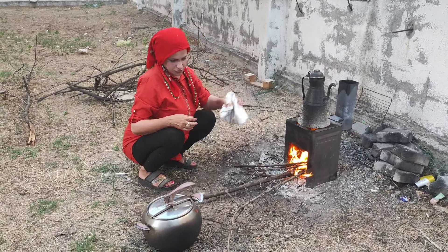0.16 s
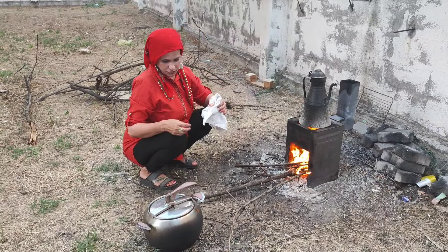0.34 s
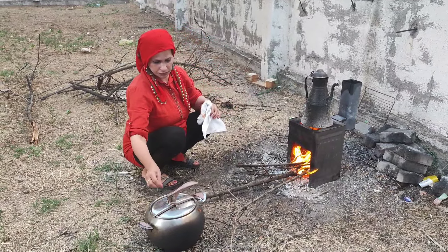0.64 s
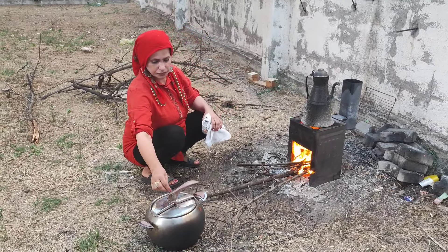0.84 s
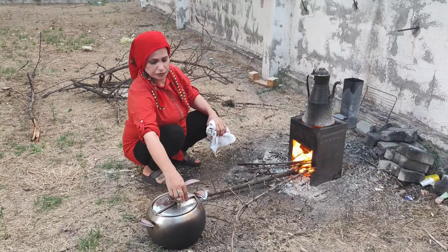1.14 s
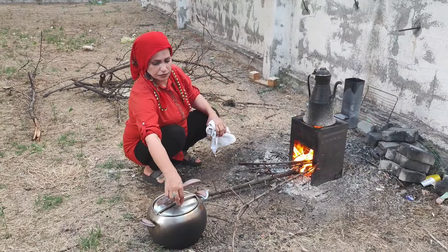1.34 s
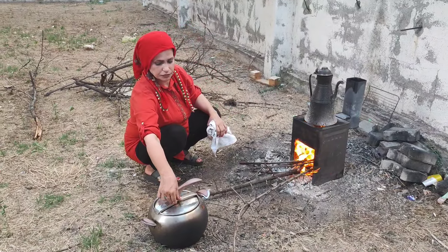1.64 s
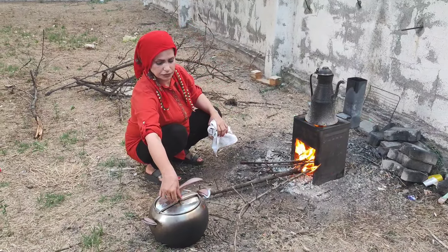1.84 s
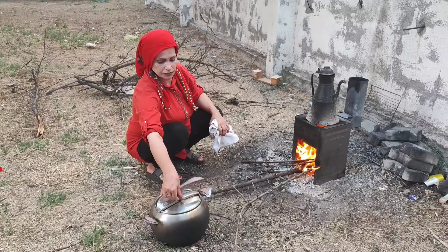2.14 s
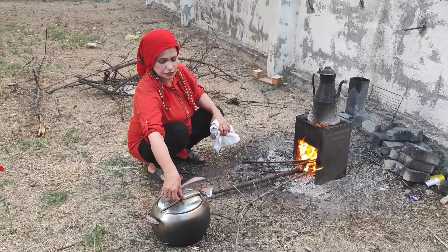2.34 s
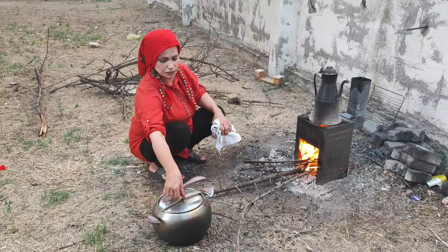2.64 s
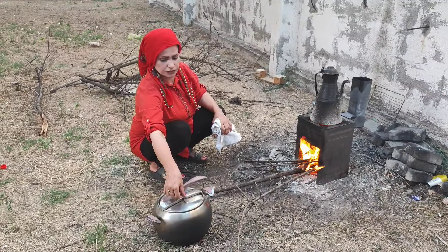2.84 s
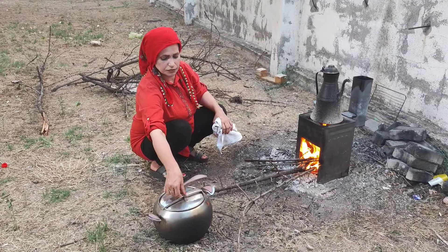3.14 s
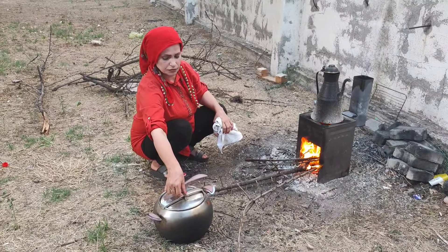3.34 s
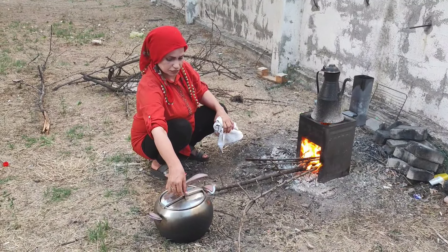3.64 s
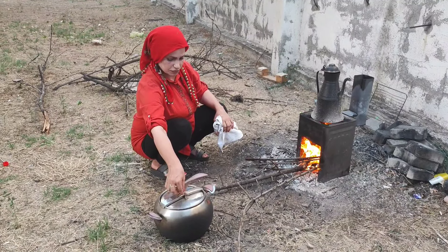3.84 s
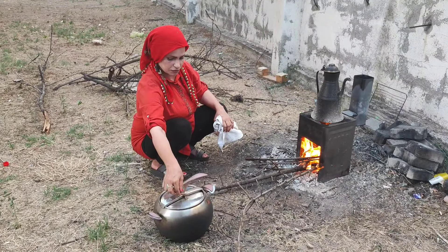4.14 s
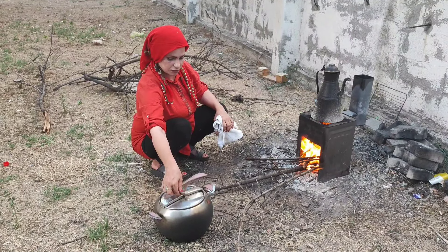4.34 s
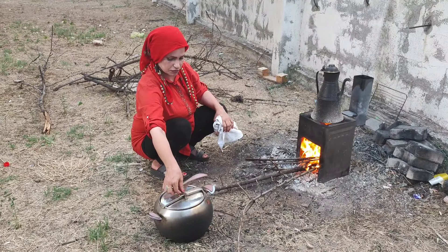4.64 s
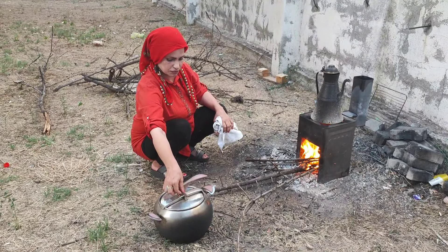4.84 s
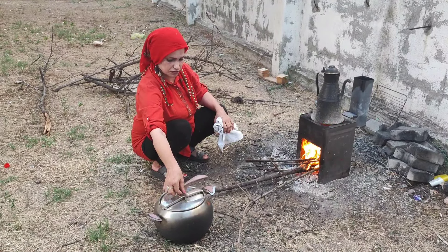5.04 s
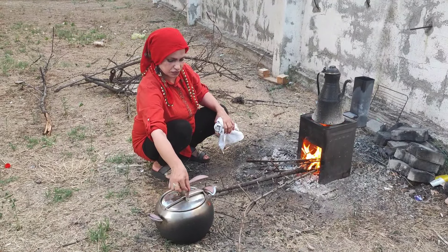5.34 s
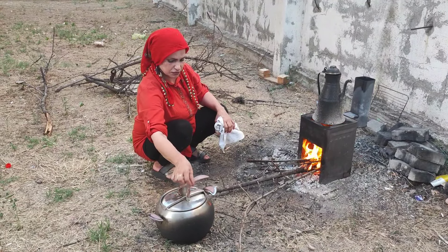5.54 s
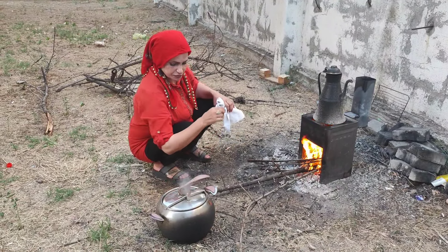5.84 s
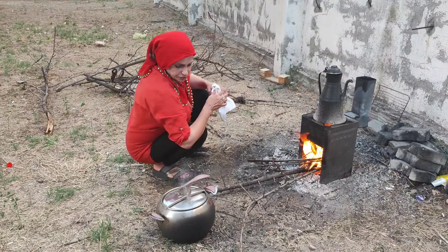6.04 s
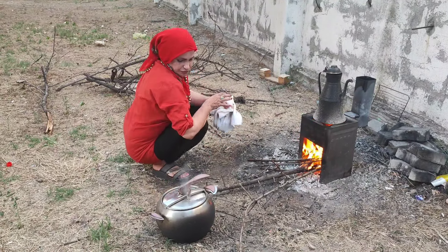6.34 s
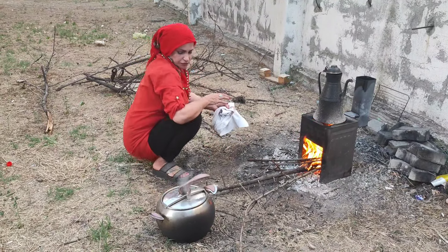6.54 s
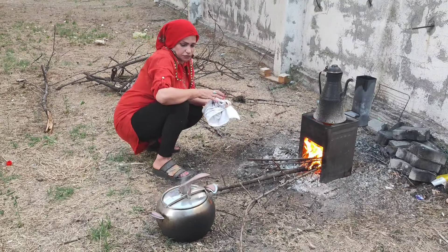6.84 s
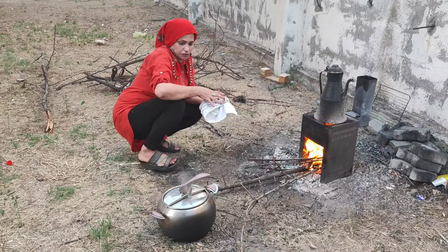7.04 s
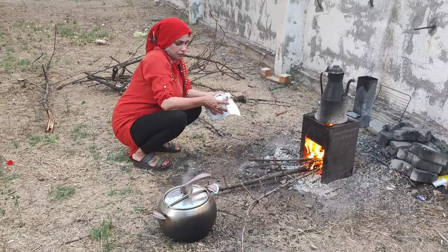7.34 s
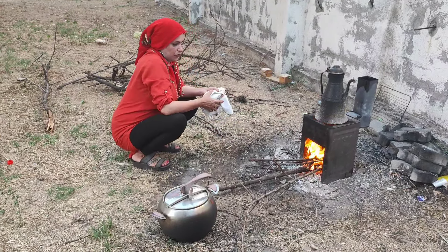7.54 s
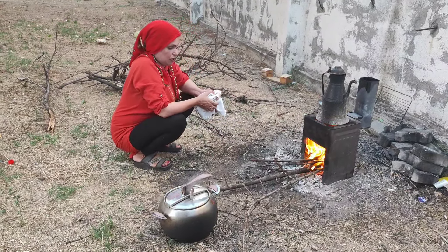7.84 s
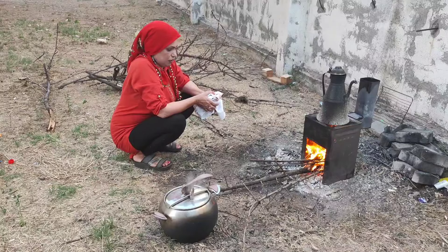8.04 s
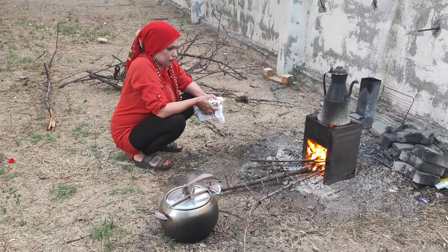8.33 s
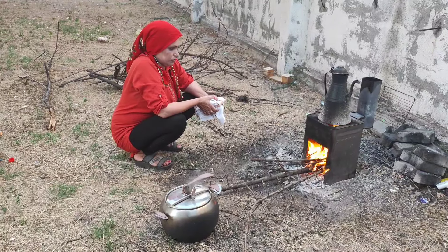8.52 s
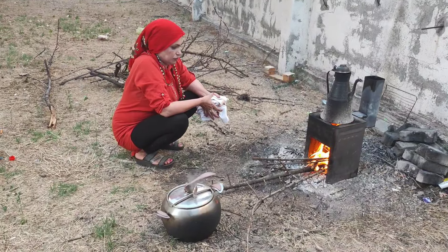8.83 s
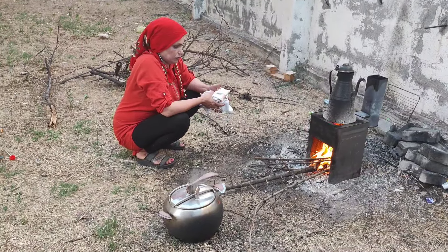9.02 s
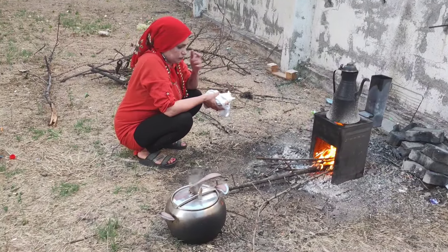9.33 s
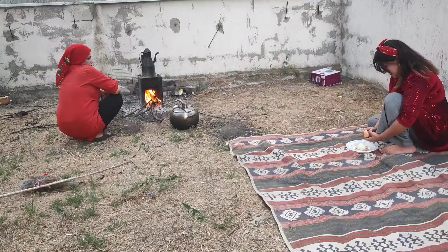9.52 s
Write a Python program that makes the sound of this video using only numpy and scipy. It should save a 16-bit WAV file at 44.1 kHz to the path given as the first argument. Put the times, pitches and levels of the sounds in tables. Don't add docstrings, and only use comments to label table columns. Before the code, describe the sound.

A thin trembling steam whistle over stove crackle, then harsh valve bursts shut twice, settling into a loud steady hiss before cutting to a distant view.

```python
import sys
import numpy as np
from scipy import signal
from scipy.fft import rfft, irfft, next_fast_len
from scipy.io import wavfile
from scipy.ndimage import uniform_filter1d

SR = 44100
rng = np.random.default_rng(int(sys.argv[2]) if len(sys.argv) > 2 else 0)


def makeup_ratio(level_db):
    decades = np.asarray(level_db, float) / 20
    return 10 ** decades


def bounce(signal):
    frames = np.transpose(np.atleast_2d(signal))
    limited = np.clip(frames, -1, 1)
    pcm = np.round(limited * 32767).astype(np.int16)
    wavfile.write(sys.argv[1], SR, pcm)


N = 426888
T = np.arange(N) / SR
HZ = np.fft.rfftfreq(next_fast_len(N), 1 / SR)

# (time [s], level [dB])
NEAR_GAIN = [(9.3955, 0), (9.3985, -38), (9.406, -48), (9.411, -90)]


def evened(x):
    return x / np.sqrt(np.mean(x ** 2) + 1e-20)


def read(points, hz):
    f, value = np.transpose(points)
    return np.interp(np.log(hz + 1), np.log(f + 1), value)


def columns(rows, t):
    s, *values = np.transpose(rows)
    return np.array([np.interp(t, s, v) for v in values])


def add(mix, s, sound):
    part = mix[:, round(s * SR):][:, :sound.shape[1]]
    part += sound[:, :part.shape[1]]


def band(x, lo_hz, hi_hz):
    return signal.sosfilt(signal.butter(2, [lo_hz, hi_hz], "band", fs=SR, output="sos"), x)


def drift(per_s):
    size = int(SR / per_s)
    return evened(uniform_filter1d(uniform_filter1d(rng.standard_normal(N), size), size))


def pair(left_db, right_db, shared):
    size = next_fast_len(N)
    a, b = rfft(rng.standard_normal((2, size)))
    both = np.array([a + 0 * shared, shared * a + np.sqrt(1 - abs(shared) ** 2) * b])
    density = makeup_ratio(np.array([left_db, right_db])) * np.sqrt(SR / 2)
    return irfft(both * density, size)[..., :N]


def jet():
    # (time [s], left-right [dB], extra lag of the right port [us])
    camera_turn = [(0.2, -4.5, 18), (1.6, -1.5, 20), (2.1, -1, 1), (2.65, -0.5, -2), (3.2, -0.5, 7),
                   (3.5, -3, 12), (4.0, 0, 3), (5.0, 0, 2), (6.0, 0, 4), (7.0, -0.5, 5), (7.7, 0.5, 3),
                   (8.3, -0.5, 3), (8.7, -1, 0), (9.0, 0, -3), (9.35, 0, -3)]
    # (time [s], flow [dB], focus of the 4-7 kHz core [dB])
    bursts = [
        [(1.875, -22, -2), (1.905, -7, -3.5), (2.05, -6.5, -2), (2.16, -4, -2), (2.22, -2.5, 1.5),
         (2.3, -3, -5.5), (2.342, -6, -6), (2.365, -20, 5)],
        [(2.46, -15, 0), (2.472, -6.5, -8), (2.5, 0, 0), (2.6, 1, -3.5), (2.87, 0, 0.5), (2.91, -1.5, -3),
         (3.12, -4, -5), (3.2, -4, -5)],
        [(3.24, 0, -3), (3.42, -2.5, -3.5), (3.6, -0.5, -2.5), (3.8, -0.5, 0), (4.0, -0.5, 0), (4.03, -3, 1.5),
         (4.047, -31, -4)],
        [(4.505, -19, -6), (4.53, -5, -2.5), (4.57, -3, -3.5), (4.6, 0.5, 0), (4.9, 0, 0.5), (5.35, -0.5, 1),
         (5.9, -0.5, -0.5), (7.3, -0.5, .5)],
        [(7.85, -0.5, -2), (8.3, 0, 1), (8.55, -0.5, 0.5), (8.68, -1, 2.5), (8.85, -0.5, -1.5), (9.1, 0, -0.5),
         (9.39, -0.5, 3.5)],
    ]
    # (from [s], to [s])
    shut_s = [
        (2.366, 2.459),
        (4.048, 4.504),
    ]
    # (time [s], half length [s], low hiss [dB])
    cupping = [
        (2.08, 0.13, 0),
        (2.21, 0.042, 6.5),
        (2.502, 0.027, -4.5),
        (3.12, 0.17, -7),
        (3.35, 0.34, 3.5),
        (3.71, 0.13, 2.5),
        (3.918, 0.12, 5),
        (4.706, 0.1, 3.5),
    ]
    # (time [s], half length [s], level [dB])
    leak_changes = [
        (1.385, .035, 10),
        (1.744, 0.11, -2),
    ]
    # (frequency [Hz], T60 [s])
    yard_t60 = [(1500, 0.71), (5000, 0.55), (9000, 0.35), (14000, 0.21)]

    hop = 64
    f, t, z = signal.stft(nozzle(), SR, nperseg=256, noverlap=256 - hop)
    turn_db, lag_us = columns(camera_turn, t)
    z[1] *= np.exp(-2j * np.pi * f[:, None] * lag_us * 1e-6)

    def share_above(from_hz, to_hz):
        return np.clip(np.log((f[:, None] + 1) / from_hz) / np.log(to_hz / from_hz), 0, 1)

    low = 1 - share_above(3760, 3780)
    up = share_above(5600, 6800)
    top = share_above(6100, 12500)
    focused = (1 - low - up) + 0.13 * low - 0.1 * top

    flow_db, focus_db = columns(sum(bursts, []), t)
    cupped_db = sum(db * np.clip(1 - abs(t - s) / half, 0, 1) for s, half, db in cupping)
    is_open = (t > bursts[0][0][0]) * np.prod([(t < a) | (t > b) for a, b in shut_s], axis=0)
    blast_db = flow_db * (1 + 0.36 * low + 0.9 * top) + focus_db * focused + cupped_db * low
    blast = is_open * makeup_ratio(2 * blast_db)

    spit_db = sum(db * np.clip(2 - 2 * abs(t - s) / half, 0, 1) for s, half, db in leak_changes)
    unrest_db = 3.0 * drift(3.3)[np.minimum(np.arange(len(t)) * hop, N - 1)]
    leak_db = -26 + focused + (spit_db - 7) * top + 0.5 * low + unrest_db
    leak = (t < 2.1) * makeup_ratio(2 * leak_db)

    keep = makeup_ratio(-120 * t[1] / read(yard_t60, f))
    echo = np.array([signal.lfilter([1 - k], [1, -k], row) for k, row in zip(keep, blast)])
    power = blast + leak + makeup_ratio(2 * -9.5) * echo

    side_db = turn_db * (1 - 1.44 * up) / 2
    patches = rng.standard_normal(blast.shape)
    patches = evened(uniform_filter1d(uniform_filter1d(patches, 5, 0), 40, 1))
    gain = np.sqrt(power) * makeup_ratio(0.59 * patches + np.array([side_db, -side_db]))
    x = signal.istft(z * gain, SR, nperseg=256, noverlap=256 - hop)[1][:, :N]
    return x * makeup_ratio(1.0 * drift(820) + 0.5 * drift(39))


def nozzle():
    # (frequency [Hz], density [dB per Hz])
    jet_left = [(900, -88.5), (1500, -82), (2300, -78.5), (3100, -71), (4500, -66.5), (7000, -65.5),
                (10000, -69.5), (15600, -68)]
    jet_right = [(900, -90.5), (2100, -75.5), (3200, -68.5), (5300, -59), (7200, -69.5), (7900, -74.5),
                 (11000, -79.5), (13500, -67.5), (15600, -74)]
    # (delay [ms], ripple [dB])
    comb_left = [(0.208, 0.25), (0.252, -0.68), (0.316, 0.36), (0.42, 0.92), (0.5, -0.46), (0.548, -0.21),
                 (0.6, -0.35), (0.676, 1.51), (0.732, 0.37), (0.864, -0.3), (0.908, 0.18), (1.076, -0.34),
                 (1.144, 0.19), (1.38, -0.21), (1.52, 0.2), (1.58, 0.39), (1.624, -0.35), (1.728, -0.72),
                 (1.896, -0.21), (2.012, -0.3), (2.172, 0.19), (2.704, 0.25), (2.952, 0.27), (2.996, 0.17)]
    comb_left_tipped = [(0.012, -0.85), (0.248, -0.64), (0.424, 0.75), (0.488, -0.37), (0.664, 1.54),
                        (0.716, 0.62), (0.756, -0.6), (0.852, -0.43), (0.92, 0.29), (1.048, -0.35),
                        (1.092, -0.58), (1.392, -0.29), (1.604, -0.4), (1.708, -0.73), (1.884, -0.46),
                        (1.996, -0.37), (2.176, -0.37), (2.284, -0.27)]
    comb_left_back = [(0.0, -0.74), (0.088, -0.29), (0.248, -0.87), (0.32, 0.61), (0.424, 0.87),
                      (0.476, -0.51), (0.604, -0.36), (0.684, 0.69), (0.724, 0.3), (0.76, 0.46),
                      (0.916, 0.34), (1.0, -0.38), (1.412, -0.27), (1.564, 0.42), (1.696, -0.38),
                      (1.82, -0.26), (3.096, 0.25), (3.908, 0.23)]
    comb_right = [(0.116, 0.24), (0.26, -1.1), (0.336, 1.42), (0.456, -0.58), (0.516, -1.31), (0.544, 0.38),
                  (0.612, 0.85), (0.668, 0.33), (0.752, -0.69), (0.808, -0.42), (0.964, 0.6),
                  (1.044, -0.53), (1.136, -0.26), (1.228, -0.33), (1.432, -0.22), (1.504, 0.45),
                  (1.572, -0.33), (1.704, -0.63), (1.744, -0.26), (1.884, 0.34), (2.028, 0.23),
                  (2.344, -0.26), (2.396, -0.35), (2.956, 0.23)]
    comb_right_tipped = [(0.0, -0.72), (0.04, 1.22), (0.064, -0.65), (0.2, 1.38), (0.268, -0.48),
                         (0.332, 2.12), (0.396, 0.37), (0.48, -1.07), (0.56, 1.42), (0.636, 0.85),
                         (0.692, 0.49), (0.94, 0.93), (0.984, 0.41), (1.352, -0.57), (1.548, -0.61),
                         (1.668, -0.4), (1.724, -0.73), (2.164, -0.43)]
    comb_right_back = [(0.0, -1.42), (0.036, 2.04), (0.064, -1.73), (0.132, -0.94), (0.196, 0.62),
                       (0.252, -1.42), (0.344, 0.97), (0.436, 1.07), (0.5, -1.15), (0.6, 0.95),
                       (0.64, 0.62), (0.92, 0.87), (1.472, 0.44), (1.6, 0.61), (1.864, 0.9), (1.908, 0.54),
                       (1.992, 0.51), (2.036, 0.72)]
    # (delay [ms], strength re diffuse [ratio])
    paths = [(-1.384, 0.05), (-1.196, -0.05), (-0.988, 0.07), (-0.792, -0.05), (-0.544, 0.09),
             (-0.476, 0.08), (-0.428, 0.1), (-0.34, -0.15), (-0.188, -0.05), (-0.092, -0.05),
             (-0.032, -0.1), (0.048, -0.16), (0.152, 0.1), (0.2, 0.14), (0.264, 0.34), (0.292, -0.09),
             (0.348, -0.3), (0.396, -0.11), (0.608, 0.18), (0.644, -0.29), (0.72, -0.26), (0.784, -0.09),
             (0.824, 0.15), (0.916, -0.06), (1.192, -0.1), (1.248, -0.08), (1.388, 0.04), (1.468, 0.05),
             (1.56, 0.09), (1.632, -0.06), (1.72, -0.06), (1.772, 0.12), (1.844, -0.16), (1.888, -0.09),
             (1.968, -0.08), (2.052, 0.04), (2.336, -0.1), (2.38, -0.08)]
    paths_tipped = [(-1.748, -0.06), (-0.988, 0.06), (-0.624, -0.07), (-0.36, -0.12), (-0.312, -0.08),
                    (-0.184, -0.1), (0.044, -0.15), (0.144, 0.2), (0.2, 0.08), (0.252, 0.4), (0.344, -0.25),
                    (0.428, 0.1), (0.508, 0.09), (0.584, 0.17), (0.628, -0.23), (0.708, -0.22),
                    (0.748, -0.13), (0.808, 0.22), (1.2, -0.07), (1.256, -0.07), (1.564, 0.07),
                    (1.716, -0.07), (1.816, -0.08), (1.864, -0.14), (1.916, -0.07), (2.072, 0.1),
                    (2.26, 0.1), (2.34, -0.06)]
    paths_back = [(-0.536, 0.09), (-0.484, 0.13), (-0.432, 0.08), (-0.356, -0.07), (-0.196, -0.08),
                  (-0.032, 0.06), (0.048, -0.13), (0.136, 0.14), (0.18, 0.12), (0.252, 0.34),
                  (0.348, -0.17), (0.424, 0.13), (0.528, 0.17), (0.584, -0.07), (0.612, 0.21),
                  (0.656, -0.11), (0.756, -0.09), (0.836, 0.27), (0.88, 0.1), (1.028, 0.08), (1.276, -0.1),
                  (1.552, 0.1), (1.748, 0.07), (1.816, -0.12), (1.86, -0.08), (2.088, 0.11), (2.356, -0.08),
                  (2.748, 0.06)]

    low_db = -2 * np.clip(np.log2(1350 / (HZ + 1)), 0, 3)
    left = np.array([delays(c).real for c in (comb_left, comb_left_tipped, comb_left_back)])
    right = np.array([delays(c).real for c in (comb_right, comb_right_tipped, comb_right_back)])
    ways = 1.32 * np.array([delays(p) for p in (paths, paths_tipped, paths_back)])
    left_db = read(jet_left, HZ) + low_db + 1.09 * left
    right_db = read(jet_right, HZ) + low_db + 1.074 * right
    poses = pair(left_db, right_db, ways / np.sqrt(1 + abs(ways) ** 2))

    tip = np.interp(T, (7.45, 8.1), [0, 1])
    back = np.interp(T, (8.55, 9.0), [0, 1])
    moving = 4 * (tip * (1 - tip) + back * (1 - back))
    blend = (poses * np.array([1 - tip, tip - back, back])).sum(1)
    return blend * makeup_ratio(np.array([[0.3], [1.5]]) * moving)


def delays(table):
    ms, strength = np.transpose(table)
    hz = np.arange(0, SR / 2 + 10, 10)
    return np.interp(HZ, hz, np.exp(-2j * np.pi * np.outer(hz, ms) / 1000) @ strength)


def whistle():
    # (time [s], pitch step [Hz], tone step [dB], octave step [dB])
    nudges = [(.385, 25, 0, 0), (.98, 6, 0, 0), (1.21, 8, 0, 0), (1.525, 8, 2.5, 0), (1.55, 10, 3, 0),
              (1.675, 40, 0, -6), (1.696, 68, 0, 0), (1.716, -28, 0, 0), (1.738, 30, 0, 0),
              (1.76, -66, -2, 3), (1.781, -40, 2, 3), (1.847, -50, -11, -1)]
    # (time [s], half length [s], tone loss [dB], octave loss [dB])
    chokes = [(.11, .06, 5, 2), (0.187, 0.037, 12, 4), (.29, .15, 1.5, 1), (0.42, 0.03, 3, -3),
              (0.652, 0.05, 5, .5), (0.728, .012, 12, 0), (0.788, .06, 8, 1), (0.895, 0.075, 18, 0),
              (0.97, .03, 14, 0), (1.04, 0.07, 4, .5), (1.26, .06, -2, 14), (1.37, 0.095, -4, 16),
              (1.505, 0.076, 5, 7), (1.688, 0.01, 13, 5), (1.728, 0.016, 4, 3), (1.775, 0.011, 5, -1)]

    step_s = 0.007
    steps = sum(np.outer(step, np.clip((T - s) / step_s + 0.5, 0, 1)) for s, *step in nudges)
    losses = sum(np.outer(loss, np.clip(1 - abs(T - s) / half, 0, 1)) for s, half, *loss in chokes)
    hz = 3457 + 20 * T + steps[0]
    tone_db = -51.5 + steps[1] - losses[0]
    octave_db = -60 + 4 * T + steps[2] - losses[1]
    turns = np.cumsum(hz + 7.5 * drift(69)) / SR
    on = np.sqrt(2) * np.clip((1.9 - T) / 0.018, 0, 1)
    tone = makeup_ratio(tone_db + 0.84 * drift(70)) * np.cos(2 * np.pi * turns) * makeup_ratio([[-3.0], [2.5]])
    octave = makeup_ratio(octave_db + 1.5 * drift(50)) * np.cos(4 * np.pi * turns) * makeup_ratio([[1.5], [-1.5]])
    return on * (tone + octave)


def wisps():
    # (from [s], to [s], frequency [Hz], level [dB])
    tones = [
        (1.695, 1.762, 3545, -57),
        (2.425, 2.464, 3443, -59),
        (2.462, 2.474, 3290, -52),
        (2.33, 2.36, 3200, -52),
        (2.458, 2.487, 6100, -54),
    ]
    out = np.zeros((2, N))
    for s, end, hz, db in tones:
        t = np.arange(0, end - s, 1 / SR)
        shape = np.sin(np.pi * t / (end - s)) ** 0.5
        add(out, s, makeup_ratio(db + 3) * shape * np.cos(2 * np.pi * hz * t) * makeup_ratio([[-3.0], [2.5]]))
    return out


def stove():
    # (time [s], peak [dB], frequency [Hz], bright part [dB])
    pops = [(0.137, -36, 191, -7), (2.49, -44, 355, -8), (3.581, -40, 285, -3), (4.771, -41, 266, -1),
            (5.962, -42.5, 307, -5), (6.29, -37, 290, -4), (7.06, -36.5, 226, -11), (7.359, -45, 301, -30),
            (8.295, -44, 186, -13), (8.457, -52, 178, 5), (8.905, -43, 171, 3), (9.136, -57, 151, 7)]
    # (time [s], peak [dB], middle band [dB], left-right [dB])
    crackles = [(0.2534, -37, 13, 4.0), (0.3774, -42, 4, 2.0), (0.4544, -46, 1, 1), (0.4893, -47, 1, -2),
                (0.5347, -48, 5, 7), (0.5616, -46, 12, 4.5), (0.5921, -48, 0, 3.0), (0.7063, -49, 8, 8),
                (0.7552, -55, -4, 4.5), (0.7807, -32, 7, 1), (0.8929, -39, -14, 0), (1.2955, -33.5, -14, 2),
                (1.3743, -36, -24, 6), (1.3844, -39, 3, 5), (1.583, -32.5, 5, 7), (1.6067, -47, 16, 7),
                (1.6656, -40, 13, 11), (1.7534, -53, 11, 5.0), (4.134, -43, -8, 6.0),
                (4.2053, -57, -6, 4.0), (4.377, -43, -7, 0), (4.4685, -41, 2, 4), (4.4892, -42, 0, 1),
                (4.5065, -50, 0, 5)]

    size = 2600
    out, t = np.zeros((2, N)), np.arange(size) / SR
    for s, db, hz, bright_db in pops:
        puff = rng.standard_normal(size)
        body = np.sin(2 * np.pi * hz * t) * (t / 0.0041) ** 2 * np.exp(2 - 2 * t / 0.0038)
        tick = evened(band(puff, 700, 3200)) * np.exp(-t / 0.0025) * makeup_ratio(bright_db - 14.0)
        add(out, s + 0.0015, makeup_ratio(db + 1.5) * (body + tick) * np.ones((2, 1)))

    shape = np.exp(-t / 0.0016) + 0.12 * np.exp(-t / 0.01)
    for s, db, middle_db, side_db in crackles:
        burst = rng.standard_normal((2, size))
        middle = makeup_ratio(min(middle_db, 2) - 2.5) * evened(band(burst, 2500, 5770))
        colour = evened(band(burst, 7700, 17000)) + middle
        ports_db = np.array([[side_db], [-side_db]]) / 2
        add(out, s, makeup_ratio(db - 2.5 + ports_db) * colour * shape)
    return out


def snaps():
    # (time [s], peak [dB], rattle [dB])
    sticks = [
        (1.6637, -24, -7),
        (7.6258, -27, -6),
    ]
    # (delay [ms], strength [ratio])
    bounces = [
        (0, 1.0),
        (1.35, -0.67),
        (2.5, 0.41),
    ]

    lead = 44
    out, t = np.zeros((2, N)), np.arange(-lead, 700) / SR
    push = 0
    for ms, strength in bounces:
        since = t - ms / 1000
        push = push + strength * (np.exp(-(since / 0.00015) ** 2) + 0.35 * np.exp(-(since / 0.0006) ** 2))
    for s, db, rattle_db in sticks:
        rattle = evened(band(rng.standard_normal(len(t)), 2000, 2800))
        wood = rattle * (t / 0.0016) ** 2 * np.exp(2 - 2 * t / 0.0015) * (t > 0)
        add(out, s - lead / SR, makeup_ratio(db) * (0.99 * push + makeup_ratio(rattle_db) * wood) * np.ones((2, 1)))
    return out


def handling():
    # (time [s], bump under 300 Hz [dB], knock [dB], scrape [dB])
    grips = [
        (.131, -45, -35, -46.5),
        (.141, -32, -40, -52),
        (0.213, -42, -43, -42.5),
        (.242, -33.5, -47, -49),
        (0.253, -50, -44, -39),
        (.276, -36.5, -49, -53),
        (.3, -37, -47, -51),
        (.326, -40, -49, -54),
        (.39, -43, -62, -62),
        (.425, -44, -62, -60),
    ]
    attack_s = 0.0032
    t60_s = np.array([[0.28], [0.12], [0.13]])
    power = 0
    for s, *db in grips:
        attack = np.clip((T - s) / attack_s, 0, 1)
        power = power + attack * makeup_ratio(2 * (np.c_[db] - 60 * abs(T - s) / t60_s))
    bump, knock, scrape = np.sqrt(power)

    swing = np.sqrt(2) * np.sin(2 * np.pi * np.cumsum(92 + 30 * drift(70)) / SR)
    ragged = evened(band(rng.standard_normal(N), 130, 373))
    thud = evened(band(rng.standard_normal(N), 500, 1230))
    grain = evened(band(rng.standard_normal((2, N)), 2040, 4600) * makeup_ratio(1.0 * drift(400)))
    return bump * (makeup_ratio(-1.5) * swing + makeup_ratio(-7) * ragged) + knock * thud + scrape * grain * makeup_ratio(5.5)


def yard():
    # (frequency [Hz], density [dB per Hz])
    yard_left = [(25, -84), (60, -74.5), (100, -78), (200, -79.5), (330, -82), (520, -88.5), (1160, -88.5),
                 (2450, -101.6), (3570, -102.3), (5860, -101), (7800, -104.1), (8010, -107.4),
                 (13910, -105.8), (15590, -108.9)]
    yard_right = [(25, -75.5), (60, -77), (100, -76.5), (200, -79.5), (330, -82.5), (520, -86),
                  (2070, -91.5), (3880, -94), (5250, -90.5), (6240, -89), (7880, -110.0), (9520, -111.7),
                  (11710, -108.3), (15590, -111.5)]
    # (frequency [Hz], shared part [ratio])
    yard_same = [(30, .9), (100, .95), (300, .86), (520, .4), (800, .1), (1200, .1), (16000, .2)]
    # (time [s], rumble [dB])
    flame = [(0.6, -49.5), (1.2, -55), (2.1, -51.5), (2.72, -51.5), (3.1, -48), (3.4, -51.5), (4.4, -54),
             (5.3, -51.5), (5.57, -53.5), (5.9, -54.5), (6.7, -55.5), (7.23, -52), (7.6, -52), (8.2, -53),
             (8.75, -50), (9.2, -51)]

    x = pair(read(yard_left, HZ), read(yard_right, HZ), np.clip(read(yard_same, HZ), 0, 1))
    swell_db = columns(flame, T)[0]
    swell_db = swell_db - swell_db.mean()
    rumble = uniform_filter1d(x, size=120, axis=1)
    swelling = rumble * makeup_ratio(0.6 * swell_db) + (x - rumble) * makeup_ratio(0.35 * swell_db)
    return swelling * makeup_ratio(1.56 * drift(23))


def far_view():
    # (frequency [Hz], density [dB per Hz])
    far_left = [(520, -97), (1810, -96), (2670, -83), (3790, -97), (6290, -83.5), (10080, -88),
                (11630, -91), (13870, -87), (15590, -92)]
    far_right = [(520, -93), (1770, -95), (2240, -87.5), (4820, -77.5), (7540, -100.9), (8960, -87),
                 (11630, -100.7), (12880, -100.0), (15590, -81)]
    lag_s = 0.00025
    shared = 0.5 * np.exp(-2j * np.pi * HZ * lag_s)
    return pair(read(far_left, HZ), read(far_right, HZ), shared) + makeup_ratio(-9.5) * yard()


def scene():
    # (time [s], level [dB])
    fade = [(9.4745, -83), (9.476, -23), (9.52, -10), (9.58, -3.5), (9.68, 2.5)]
    near = jet() + whistle() + wisps() + yard() + stove() + snaps() + handling()
    return near * makeup_ratio(columns(NEAR_GAIN, T)) + far_view() * makeup_ratio(columns(fade, T))


def unmasked(z, masker, table):
    def narrow(v):
        power = abs(v[..., :512, :]) ** 2
        return uniform_filter1d(power.reshape(len(v), 128, 4, -1).mean(2), size=2)

    under_db = read(table, np.arange(128) * SR / 256)[:, None]
    keep = narrow(z) > uniform_filter1d(narrow(masker), size=11, axis=1) / makeup_ratio(2 * under_db)
    keep[:, :6] = True
    keep = np.concatenate([keep, keep[:, -1:]], 1)
    return z * np.repeat(keep, 4, 1)[:, :513]


def roll_off(x):
    return signal.sosfilt(signal.butter(12, 16920, fs=SR, output="sos"), x)


def record(dry):
    # (frequency [Hz], depth [dB])
    mask_sum = [(1100, 13), (1650, 9), (2000, 12), (2700, 14), (3400, 17), (5000, 14), (8000, 11),
                (15500, 10.5)]
    mask_port = [(1000, 17), (5000, 16), (7800, 7.5), (11000, 6), (15500, 7.5)]

    z = signal.stft(dry, nperseg=1024, window="cosine")[2]
    level = np.sqrt((abs(z) ** 2).mean(0, keepdims=True))
    mid, side = unmasked(np.array([z[0] + z[1], z[0] - z[1]]) / 2, level, mask_sum)
    z = np.array([mid + side, mid - side])
    thinned = signal.istft(unmasked(z, z, mask_port), nperseg=1024, window="cosine")[1][:, :N]
    thinned = thinned * makeup_ratio(np.where(T < 9.45, columns(NEAR_GAIN, T), 0))
    lowpass = signal.firwin(2047, 15745, window=("kaiser", 9), fs=SR)
    limited = signal.oaconvolve(thinned, lowpass[None], "same")
    return roll_off(limited - makeup_ratio(-76.5))


dry = scene()
out = record(dry)
bounce(out)
```